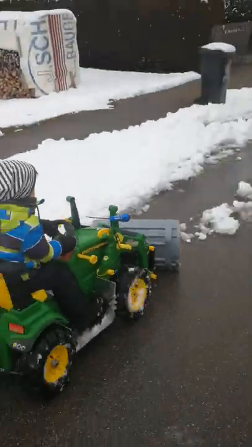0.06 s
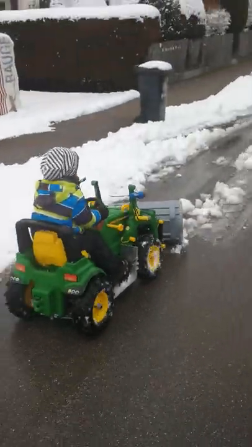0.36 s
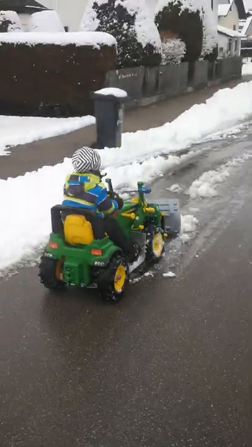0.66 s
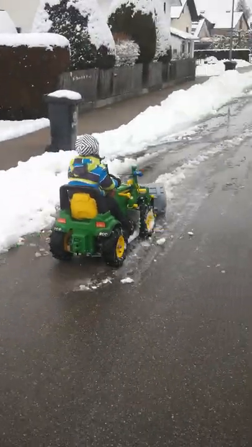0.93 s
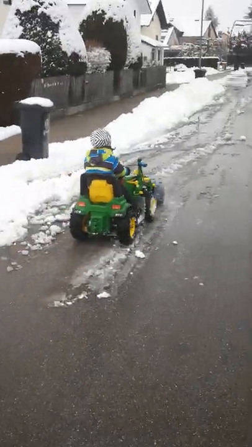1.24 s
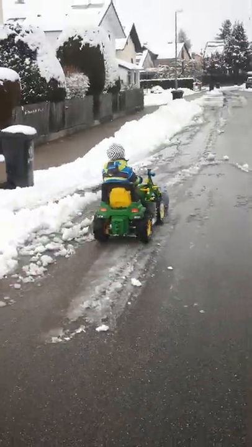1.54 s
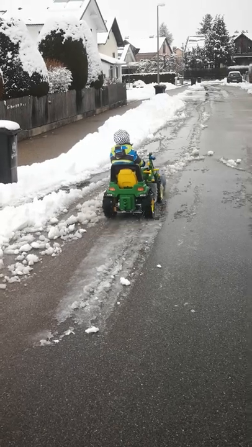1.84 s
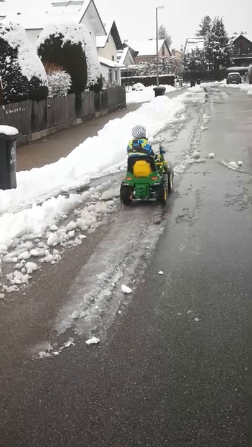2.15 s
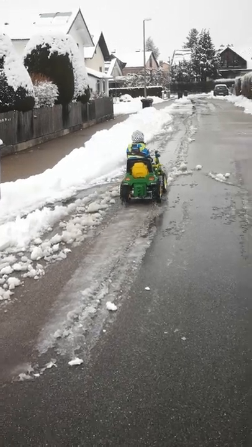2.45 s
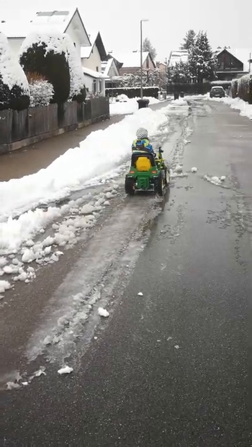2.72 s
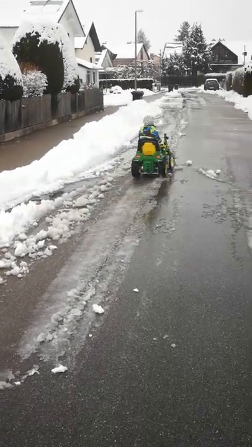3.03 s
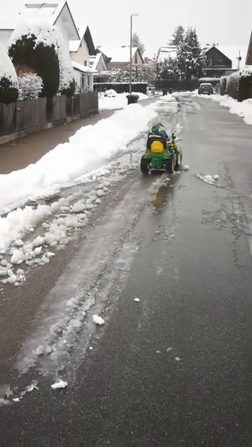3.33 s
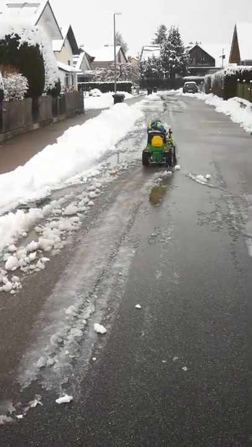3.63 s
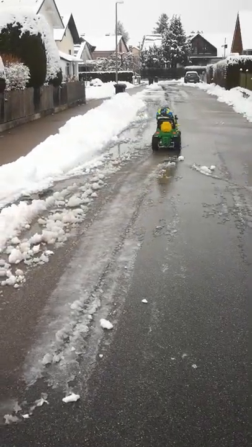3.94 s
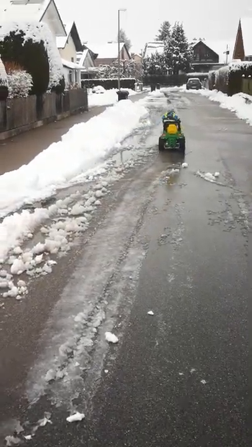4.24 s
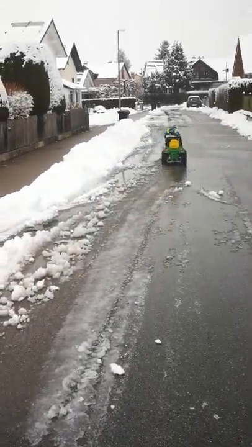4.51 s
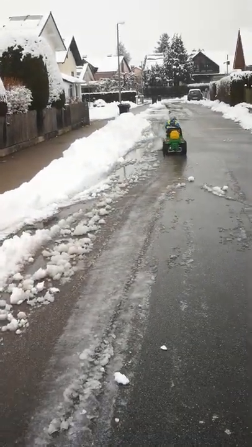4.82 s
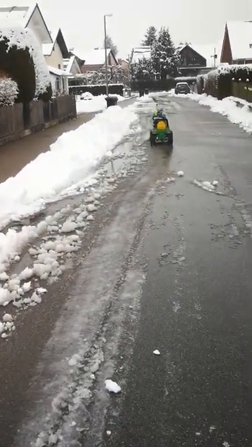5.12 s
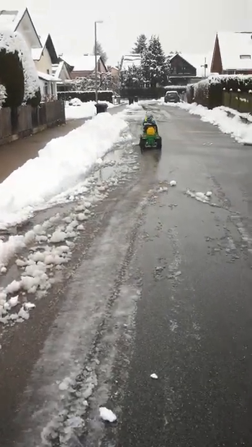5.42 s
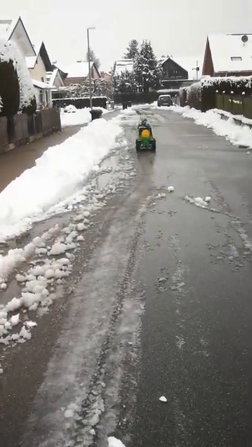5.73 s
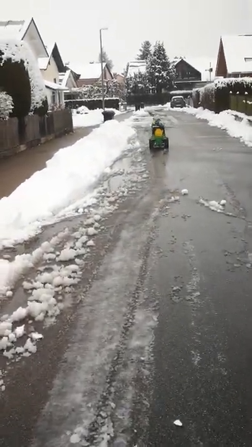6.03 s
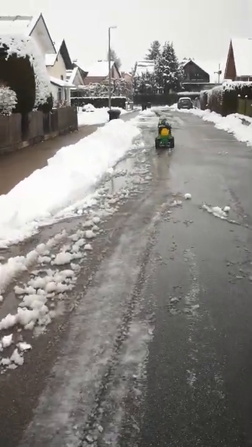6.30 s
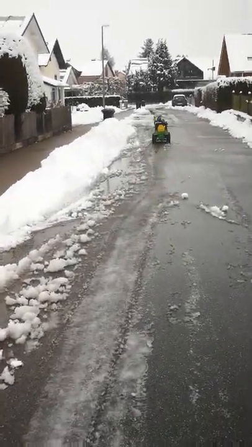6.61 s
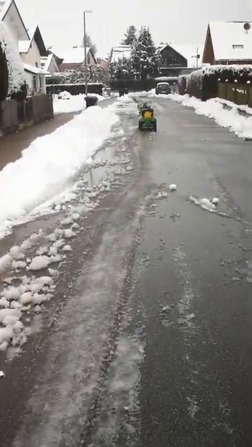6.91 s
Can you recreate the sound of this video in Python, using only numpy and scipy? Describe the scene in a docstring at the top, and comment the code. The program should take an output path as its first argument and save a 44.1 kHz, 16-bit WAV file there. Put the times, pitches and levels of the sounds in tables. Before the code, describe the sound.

A small electric toy tractor pushes a plastic snow blade over wet, slushy asphalt, starting right beside the microphone. For the first 0.7 seconds the blade scrapes loudly, grinding grit, with hollow knocks, plastic clacks and a fine fizz of spray. From about 1 to 2.4 seconds it is quieter: hard wheels rumble in the hollow body and hiss on the wet road. The blade catches briefly around 2.5 seconds. From 2.8 seconds to the end at about 7 seconds it sticks and slips in uneven, juddering scrapes with frequent dull thuds, strongest between 3 and 4.5 seconds but softer than the opening. Slush crunches and small ice grains snap throughout this stretch, with light spray around 4.5 seconds. The wheel rumble fades steadily as the toy drives away. Faint, low street noise lies underneath.

```python
"""A child's electric toy tractor pushes a plastic snow blade along a wet, slushy street.
It starts close to the microphone and drives away. The blade sticks, slips and knocks over the
asphalt, grinding grit and crushing slush; hard wheels rumble in the hollow shell and throw up spray.
The microphone's two ports hear it with a reflection off a nearby surface, the street faint behind."""
import sys
import numpy as np
from scipy import signal
from scipy.io import wavfile
from scipy.ndimage import uniform_filter1d

SR = 44100
rng = np.random.default_rng(int(sys.argv[2]) if len(sys.argv) > 2 else 0)


def generate_wav(signal):
    """Clip the signal to [-1, 1] and save it as 16-bit WAV at the path in sys.argv[1]."""
    frames = np.transpose(np.atleast_2d(signal))
    scaled = np.clip(frames, -1, 1) * 32767
    pcm = np.round(scaled).astype(np.int16)
    wavfile.write(sys.argv[1], SR, pcm)


N = 315756
TIME = np.arange(N) / SR


def amp(db):
    """Decibels to gain."""
    return 10 ** (np.asarray(db) / 20)


def unit(x):
    """Scales to rms 1."""
    return x / np.sqrt(np.mean(x ** 2) + 1e-20)


def unit_peak(x):
    """Scales to peak 1."""
    return x / abs(x).max()


def spectrum_at(points, hz):
    """Reads a spectrum on a log-frequency axis."""
    freq_hz, value = np.transpose(points)
    return np.interp(np.log(hz + 1), np.log(freq_hz + 1), value)


def follow(rows, t=TIME):
    """The columns of a curve table at the times t."""
    time_s, *columns = np.transpose(rows)
    return [np.interp(t, time_s, column) for column in columns]


def add(mix, start_s, sound):
    """Mixes a sound in at start_s."""
    part = mix[max(round(start_s * SR), 0):][:len(sound)]
    part += sound[:len(part)]


def colour(x, spectrum, size=2048):
    """Causal filter with the given spectrum, so clicks keep their attack."""
    log_gain = np.log(amp(spectrum_at(spectrum, abs(np.fft.fftfreq(size, 1 / SR)))))
    taps = np.fft.ifft(np.exp(np.conj(signal.hilbert(log_gain)))).real
    return signal.fftconvolve(x, taps)[:len(x)]


def mode(x, hz, width_hz):
    """One damped mode at a set pitch."""
    return signal.lfilter(*signal.iirpeak(hz, hz / width_hz, SR), x)


def resonate(x, hz, width_hz):
    """A resonance whose pitch can follow a curve, at rms 1."""
    turn = np.exp(2j * np.pi * np.cumsum(hz * np.ones(len(x))) / SR)
    pole = np.exp(-np.pi * width_hz / SR)
    return unit((turn * signal.lfilter([1], [1, -2 * pole, pole * pole], x / turn)).real)


def steady(x, window_s):
    """Holds the slow level at 1 and keeps the fast grain."""
    power = uniform_filter1d(x ** 2, int(window_s * SR))
    power = uniform_filter1d(power, int(window_s * SR / 2))
    return x / np.sqrt(abs(power) + 1e-12)


def drift(count, step_s):
    """A slow random curve of spread about 1."""
    return np.interp(np.arange(count) / SR / step_s, np.arange(512), rng.standard_normal(512))


def clicks(per_s, spread_db):
    """Random clicks of either sign and uneven size."""
    size = amp(spread_db * np.minimum(rng.exponential(1, N), 4))
    return size * rng.choice([-1, 1], N) * (rng.random(N) < per_s / SR)


def surges(per_s, decay_s, base, rise_s=0.0023):
    """Pressure that builds quickly at uneven moments and dies away after each."""
    kicks = rng.uniform(0.66, 1, N) * (rng.random(N) < per_s / SR)
    pressure = signal.lfilter([1], [1, -np.exp(-1 / (decay_s * SR))], kicks)
    return base + uniform_filter1d(pressure, 1 + int(2 * rise_s * SR))


# The street in the distance: freq_hz, gain_db
STREET_SPECTRUM = [(15, -35), (50, 3), (110, -7), (220, 29.5), (500, 14), (1000, -56), (3000, -38),
                   (8000, -31), (16000, -54)]

def street(level_db, stereo_width):
    """Faint far-off background, nearly the same at both ports."""
    common, side = (unit(colour(rng.standard_normal(N), STREET_SPECTRUM)) for _ in range(2))
    return amp(level_db) * (common + stereo_width * np.array([side, -side]))


def scattered(x, tail_db, tail_s, size=256):
    """Paths over road and fences change as the toy moves: a short tail and a different blur per port."""
    t = np.arange(SR // 2) / SR
    tail = rng.standard_normal(len(t)) * np.exp(-t / tail_s)
    x = x + amp(tail_db) * signal.fftconvolve(x, tail / np.linalg.norm(tail))[:N]
    frames = signal.stft(x, SR, nperseg=size)[2]
    blurred = frames * np.exp(2j * np.pi * rng.random((2, *frames.shape)))
    return np.std(x) * unit(signal.istft(blurred, SR, nperseg=size)[1][:, :N])


# Echo off a surface beside the microphone, shifting with the angle: time_s, left_ms, right_ms
REFLECTION_DELAY = [(0, 1.52, 1.03), (1.1, 1.62, 1.17), (2.5, 1.76, 1.19), (3.0, 1.8, 1.25),
                    (4.1, 1.85, 1.27), (4.4, 1.9, 1.39), (5.15, 2.0, 1.44), (5.45, 1.91, 1.37),
                    (7.16, 1.9, 1.38)]
# Strength of that echo: freq_hz, left_gain, right_gain
REFLECTION_GAIN = [(196, 0.67, 0.61), (1170, 0.12, 0.55), (2900, 0.049, 0.16), (6500, 0.036, 0.52),
                   (14100, .02, 0.74)]
# The left port's lead and treble balance; the right port sounds muffled until about 4.2 s,
# then opens up: time_s, left_lead_samples, left_treble_db
PORT_BALANCE = [(0, 1.34, 14), (1.5, 3.25, 14), (4.1, 5.6, 17), (4.4, 4.14, -4.5), (7.16, 4.7, 5)]
# Scattered sound against direct sound: freq_hz, gain_db
SCATTER_SPECTRUM = [(30, -51), (200, -35), (800, -13.5), (1500, -2), (4000, -6), (7000, -2.5), (14000, 2.5)]

def microphone(x, shade_hz, scatter_db, size=1024):
    """Each port hears the direct sound, a close reflection that combs it, and the scatter."""
    framing = dict(fs=SR, nperseg=size, noverlap=size * 3 // 4)
    hz, t, direct = signal.stft(x, **framing)
    diffuse = signal.stft(scattered(x, tail_db=-4.5, tail_s=0.015), **framing)[2]
    hz = hz[:, None]
    side = np.array([0.5, -0.5])[:, None, None]
    lead_samples, treble_db = follow(PORT_BALANCE, t)
    delay_ms = np.array(follow(REFLECTION_DELAY, t))[:, None]
    share = np.array([spectrum_at(np.array(REFLECTION_GAIN)[:, [0, port]], hz) for port in (1, 2)])
    bounce = share * np.exp(-2j * np.pi * hz * delay_ms / 1000)
    comb = 1 + bounce + 0.012 * bounce ** 2  # a weaker second bounce sharpens the peaks
    arrival = np.exp(2j * np.pi * side * hz * lead_samples / SR)
    shade = amp(side * treble_db * hz / (hz + shade_hz))
    wet = amp(spectrum_at(SCATTER_SPECTRUM, hz) + scatter_db)
    centre = np.sqrt(abs((shade * arrival).mean(0)) ** 2 + wet ** 2 / 2)
    both = shade * comb * (direct * arrival + wet * diffuse) / centre  # the ports' sum keeps its colour
    return signal.istft(both, **framing)[1][:, :N]


# Puddles along the street: start_s, end_s, level_db
PUDDLES = [(0, 0.804, -52.5), (4.246, 4.726, -49.5), (4.656, 5.19, -55.5), (5.55, 5.776, -52.5),
           (5.995, 6.25, -62)]
# Fine droplets: freq_hz, gain_db
MIST_SPECTRUM = [(6000, -42), (9500, 13), (11500, 6), (16000, -3)]

def spray(gain_db, between_puddles_db):
    """Tiny droplets fizz off the wheels and the blade, swelling in each puddle."""
    level = np.full(N, amp(between_puddles_db))
    for start_s, end_s, level_db in PUDDLES:
        swell = np.sin(np.linspace(0, np.pi, int((end_s - start_s) * SR)))
        add(level, start_s, amp(level_db) * swell)
    drops = surges(per_s=80, decay_s=0.005, base=0.7) * clicks(per_s=12000, spread_db=2)
    return amp(gain_db) * level * steady(colour(drops, MIST_SPECTRUM), window_s=0.29)


# The toy's hollow plastic shell: pitch_hz, width_hz, gain_db
SHELL_MODES = [(178.4, 92, -10.5), (224.1, 17, 2.5), (266.2, 30.6, 2.5), (342.5, 57, 3.5),
               (461, 35.3, -0.5), (498.5, 84, -2), (622, 130, -2.5), (673.7, 80, -1.5), (830, 128, -9),
               (952, 136, -4.5), (1035, 44, -5.5)]

def shell(force, wander_db=3.0, wander_s=0.04):
    """The body rings in damped modes; their shares change as the point of contact wanders."""
    out = np.zeros(len(force))
    for k, (pitch_hz, width_hz, gain_db) in enumerate(SHELL_MODES):
        share = amp(wander_db * drift(len(force), wander_s))
        out += (-1) ** k * amp(gain_db) * mode(force * share, pitch_hz, width_hz)
    return out


# The wheels fade with distance from the microphone: time_s, gain_db
WHEEL_FADE = [(0, 2.5), (.85, -3), (1.85, -4.5), (2.3, -5), (2.7, -8.5), (4.3, -12.5), (6.0, -14.5),
              (7.16, -15)]
# Rumble in the shell and hiss of wet treads: freq_hz, gain_db
RUMBLE_SPECTRUM = [(30, -32), (70, -4.5), (125, 2.5), (165, -8), (220, -5), (330, -10.5), (450, -13),
                   (650, -11), (1000, -16.5), (2000, -23), (6000, -28)]
TREAD_SPECTRUM = [(400, -2.5), (1000, 6), (2000, 4.5), (2700, 4), (3800, 3.5), (5000, -4.5), (8000, -7.5),
                  (11000, -13.5), (16000, -10.5)]

def wheels(rumble_db, hiss_db):
    """Hard treads patter on the asphalt, drum in the shell and peel off the water film."""
    patter = surges(per_s=39, decay_s=0.0098, base=0.64) * clicks(per_s=3000, spread_db=-1.0)
    rumble = steady(colour(shell(patter), RUMBLE_SPECTRUM), window_s=0.074)
    hiss = steady(colour(clicks(per_s=16000, spread_db=2.2), TREAD_SPECTRUM), window_s=0.15)
    return amp(follow(WHEEL_FADE)[0]) * (amp(rumble_db) * rumble + amp(hiss_db) * hiss)


# Ice grains and drops snap on the road: start_s, level_db, pitch_hz
ICE_SNAPS = [(0.09, -20, 9000), (3.854, -29, 6950), (3.9696, -39, 8500), (4.245, -33, 9000),
             (6.892, -37, 9500), (3.423, -25, 12400), (3.6387, -28.5, 6400), (3.988, -23.5, 7300),
             (4.0315, -22.5, 6300), (4.5397, -28, 9000), (4.6301, -32, 7040), (4.642, -30, 9100),
             (5.249, -37, 7000), (5.093, -30.5, 6200), (5.475, -37, 6000), (5.526, -36, 6800),
             (6.1963, -33, 6500), (6.4515, -35, 6850), (6.674, -35, 7000)]
# Loose plastic parts clack on the toy: start_s, level_db, pitch_hz
PLASTIC_CLACKS = [(0.058, -19, 1040), (0.1, -14.5, 1040), (0.318, -19, 1440), (0.592, -20, 850),
                  (2.2468, -29.5, 2370), (2.978, -25.5, 3420), (4.4284, -30, 1330), (4.784, -30, 1430),
                  (4.8798, -27, 1400), (5.6216, -23, 3500), (5.6826, -30.5, 2390)]

def ticks(table, gain_db, decay_s, q):
    """Snaps or clacks: short bursts, each ringing round its own pitch."""
    out, t = np.zeros(N), np.arange(1024) / SR
    for start_s, level_db, pitch_hz in table:
        burst = rng.standard_normal(len(t)) * np.exp(-t / decay_s)
        ring = signal.iirpeak(pitch_hz, q, SR)
        tick = signal.lfilter(*ring, signal.lfilter(*ring, burst))
        add(out, start_s, amp(level_db + gain_db) * unit_peak(tick))
    return out


# Slush crushed under the blade: freq_hz, gain_db
SLUSH_SPECTRUM = [(2500, -60), (4300, -24), (5000, -2), (6900, 5.5), (7900, 0), (8800, -5), (10300, -27),
                  (16000, -48)]

def ice_crackle(slush_level, gain_db, per_s):
    """Small ice grains burst at random wherever the blade crushes slush."""
    return amp(gain_db) * slush_level * unit(colour(clicks(per_s, spread_db=4.0), SLUSH_SPECTRUM))


def passing_lumps(x, patch_db, size=256):
    """Stones and lumps of all sizes pass: the colour shifts from moment to moment."""
    frames = signal.stft(x, SR, nperseg=size)[2]
    patch_shape = np.outer(np.hanning(9), np.hanning(11))
    patches = unit(signal.convolve2d(rng.standard_normal(frames.shape), patch_shape, "same"))
    return signal.istft(frames * amp(patch_db * patches), SR, nperseg=size)[1][:N]


def without_deep_bass(x, low_cut_hz=118):
    """Cuts away the deep bass below low_cut_hz."""
    return signal.sosfilt(signal.butter(4, low_cut_hz, "high", fs=SR, output="sos"), x)


# The stiff plastic blade: pitch_hz, width_hz, gain_db
BLADE_MODES = [(1211, 26, -1), (1454, 185, 0.5), (2022, 93, 5), (2166, 64, 3.5), (2744, 170, -0.5),
               (3144, 76, 2), (3410, 82, -4.5), (3770, 100, 2), (4490, 78, 0), (6400, 330, -12)]

def blade_ring(x, ring_db, wander_db=3, wander_s=0.22):
    """The blade adds its ring; each mode swells and fades as the contact moves along the edge."""
    ring = np.zeros(len(x))
    for pitch_hz, width_hz, gain_db in BLADE_MODES:
        swell_db = wander_db * drift(len(x), wander_s)
        ring += amp(gain_db + ring_db + swell_db) * mode(x, pitch_hz, width_hz)
    return x + ring


# The blade bites into the street and scrapes along: start_s, end_s, force_db
BITES = [(0.0, 0.154, -25), (0.17, 0.193, -30), (0.188, 0.284, -25), (0.341, 0.389, -28),
         (0.404, 0.507, -27.5), (0.541, 0.605, -30), (0.681, 0.744, -36), (0.899, 0.931, -38),
         (2.394, 2.602, -43.5), (2.455, 2.53, -37), (2.738, 2.803, -49), (2.8, 2.865, -37),
         (2.864, 2.998, -32.5), (3.074, 3.112, -39.5), (3.238, 3.328, -34), (3.404, 3.484, -37.5),
         (3.502, 3.538, -36.5), (3.556, 3.657, -32), (3.673, 3.687, -32), (3.716, 3.82, -31),
         (3.81, 3.975, -34.5), (3.972, 4.063, -31), (4.072, 4.296, -35), (4.332, 4.509, -35.5),
         (4.587, 4.692, -39), (4.823, 4.944, -42.5), (4.981, 5.156, -37), (5.182, 5.2, -36.5),
         (5.244, 5.3, -40.5), (5.287, 5.42, -36), (5.433, 5.59, -36.5), (5.61, 5.741, -37.5),
         (5.846, 5.979, -37.5), (6, 6.039, -42), (6.104, 6.197, -44.5), (6.192, 6.248, -36.5),
         (6.277, 6.425, -41.5), (6.422, 6.509, -36.5), (6.578, 6.745, -37), (6.771, 6.792, -40.5),
         (6.814, 7.113, -38.5)]
USUAL_FORCE_DB = -36

def blade_force(rise_s, release_s, sag_db, drag_db, drag_s):
    """The blade bites at once, eases, lets go, and drags on ever more lightly until the next bite."""
    force = np.zeros(N)
    for start_s, end_s, force_db in BITES:
        first, length_s = round(start_s * SR), end_s - start_s
        t = TIME[:N - first][:2 * SR]
        after_s = np.maximum(t - length_s, 0)
        hold = np.minimum(t / rise_s, 1) * amp(force_db + sag_db * np.maximum(1 - t / length_s, 0))
        release = np.maximum(np.exp(-after_s / release_s), amp(drag_db) * np.exp(-after_s / drag_s))
        part = force[first:][:len(t)]
        part[:] = np.maximum(part, hold * release)
    return force


# Notes of the rubbing edge, at the usual force: start_s, end_s, pitch_hz, width_hz, level_db
SINGING_NOTES = [(0.05, 0.116, 1046, 130, -37.5), (2.455, 2.498, 970, 170, -37.5),
                 (2.8, 4.076, 949, 69, -51.5), (3.554, 4.06, 2160, 130, -58), (6.192, 7.0, 3400, 250, -55),
                 (6.19, 7.12, 1187, 80, -55)]

def blade_singing(force, fade_s, growth=0.81):
    """Single modes of the blade ring on while the edge rubs, louder under more force."""
    out = np.zeros(N)
    for start_s, end_s, pitch_hz, width_hz, level_db in SINGING_NOTES:
        t = np.arange(0, end_s - start_s, 1 / SR)
        fade = np.clip(np.minimum(t, t[-1] - t) / fade_s, 0, 1)
        rubbing = rng.standard_normal(2 * SR)[:len(t)]
        add(out, start_s, amp(level_db) * fade * resonate(rubbing, pitch_hz, width_hz))
    return out * (force / amp(USUAL_FORCE_DB)) ** growth


# The road under the blade, at the usual force: time_s, grit_db, slush_db
ROAD_SURFACE = [(0, -35.5, -49), (.3, -45, -63), (.48, -43.5, -56), (.62, -38.5, -50.5), (1.0, -42, -51.5),
                (2.4, -43, -53), (2.95, -45.5, -53.5), (3.35, -53, -62.5), (3.8, -48.5, -45.5),
                (4.28, -48.5, -44.5), (4.32, -47.5, -53), (4.65, -45.5, -45.5), (5.3, -44.5, -51),
                (5.95, -48, -50), (6.07, -45, -48.5), (6.2, -47.5, -52), (6.47, -47, -45.5),
                (6.62, -45, -55.5), (6.79, -50.5, -53.5), (6.9, -47, -51), (7.16, -41.5, -49.5)]

def scrape_levels(force, grit_growth=0.78, slush_growth=0.55):
    """Judder follows the force; grit and slush grow more slowly and depend on the road."""
    grit_db, slush_db = follow(ROAD_SURFACE)
    load = force / amp(USUAL_FORCE_DB)
    return np.array([force, amp(grit_db) * load ** grit_growth, amp(slush_db) * load ** slush_growth])


# Shell judder and grit, close to the microphone and farther down the street: freq_hz, gain_db
JUDDER_CLOSE = [(40, -12), (110, -5), (200, 0), (370, 6), (700, 6), (1080, -5), (1500, -14), (2500, -5),
                (6000, -21)]
GRIT_CLOSE = [(300, -9), (800, -1), (920, 6), (1050, 9), (1200, 2), (1450, 3), (2100, -2), (2600, -4.5),
              (3800, -1.5), (4750, -2), (5300, -5), (9000, -15), (16000, -44)]
JUDDER_FAR = [(40, -31), (110, -33), (190, 0), (700, 1), (950, -2), (1120, -21.5), (2500, -8), (6000, -24)]
GRIT_FAR = [(300, -43), (800, 10), (1150, 10), (1500, 4), (1850, 6), (2200, -1.5), (2600, -1), (3300, 3),
            (4100, 1.5), (4700, 0.5), (5500, -2), (8000, -7), (10000, -10), (16000, -31)]
# The blade's hollow resonance shifts as it tilts and bends: time_s, pitch_hz
HOLLOW_PITCH = [(2.4, 564), (3.8, 600), (3.88, 508), (4.01, 660), (4.12, 500), (4.24, 636), (5.03, 450),
                (5.08, 600), (5.12, 517), (5.71, 480), (5.81, 600), (5.85, 480), (7.11, 616), (7.15, 496)]
# The shell booms under a heavy load, relative to its judder: time_s, level_db
SHELL_BOOM = [(0, -10.5), (2.9, -19), (3.5, -23), (3.8, -7.5), (4.6, -7.5), (5.1, -24), (6.1, -28),
              (6.9, -4)]

def blade_scrape(levels, judder_spectrum, grit_spectrum, judder_db, hollow_db, grit_db, slush_db):
    """The edge sticks and slips; each slip shakes the shell, grinds grit and crushes slush."""
    slips = surges(per_s=90, decay_s=0.007, base=0.3)
    shake = (slips + 0.67) * clicks(per_s=2200, spread_db=1.0)
    hollow = resonate(slips * clicks(per_s=1000, spread_db=1.0), follow(HOLLOW_PITCH)[0], width_hz=182)
    boom = resonate(slips * clicks(per_s=2700, spread_db=-5.0), hz=200, width_hz=60)
    body = unit(colour(shell(shake), judder_spectrum))
    judder = steady(body + amp(hollow_db) * hollow + amp(follow(SHELL_BOOM)[0]) * boom, window_s=0.026)
    grit = colour((slips + 1.35) * clicks(per_s=4500, spread_db=2.5), grit_spectrum)
    grit = steady(blade_ring(passing_lumps(grit, patch_db=0.15), ring_db=2), window_s=0.05)
    slush = colour((slips + 0.22) * clicks(per_s=1200, spread_db=1.5), SLUSH_SPECTRUM)
    slush = steady(blade_ring(passing_lumps(slush, patch_db=1.0), ring_db=-4), window_s=0.067)
    return without_deep_bass(amp([judder_db, grit_db, slush_db]) @ (levels * [judder, grit, slush]))


# The blade hits a bump in the street and drops: start_s, thud_db, crack_db, pitch_hz
BUMPS = [(0.087, -7.5, -12, 676), (0.136, -7.5, -13, 404), (0.193, -13, -16.5, 935), (0.314, -15, -21, 400),
         (0.342, -18, -32, 340), (0.421, -10, -27, 350), (0.47, -9.5, -42, 370), (0.554, -18.5, -20, 330),
         (0.591, -11, -29, 716), (2.417, -20, -24, 394), (2.469, -17, -40, 790), (2.874, -14.5, -36, 550),
         (2.928, -16, -38, 623), (2.962, -14, -28, 674), (3.084, -19, -26, 310), (3.241, -20, -40, 560),
         (3.279, -16, -35, 330), (3.313, -17.5, -33, 556), (3.422, -20, -30.5, 395),
         (3.471, -14.5, -28.5, 636), (3.641, -16, -27, 650), (3.716, -16.5, -44, 350),
         (3.77, -11.5, -23, 610), (4.034, -14.5, -32, 550), (4.21, -19, -38, 620), (4.248, -13, -31, 596),
         (4.375, -17, -36, 645), (4.452, -14.5, -41, 580), (4.533, -18.5, -28.5, 450),
         (4.638, -19.5, -24, 527), (4.727, -20.5, -34, 390), (4.831, -22.5, -33, 358),
         (5.09, -16.5, -26, 590), (5.152, -16, -33, 560), (5.302, -16.5, -23, 532),
         (6.207, -18.5, -31.5, 560), (6.346, -13.5, -21.5, 600), (6.434, -18, -34, 490),
         (6.45, -19, -30.5, 650), (6.484, -24, -42, 650), (6.702, -16.5, -26, 570), (6.89, -16, -25, 400),
         (6.943, -15.5, -29, 680), (7.047, -18.5, -29, 335), (7.125, -19.5, -31, 480)]
# The crack of its edge: freq_hz, gain_db
CRACK_SPECTRUM = [(400, -10), (1200, 7.5), (2100, -1.5), (3300, 4), (4800, -0.5), (7000, -1.5), (9000, -3),
                  (11000, -19), (16000, -13)]

def blade_knocks(thud_gain_db, crack_gain_db, rattle_s, crack_s, note_db, note_s, push_db, push_s):
    """Each bump or bite gives a sharp push, a short hollow note, a dying rattle and a crack."""
    thuds, cracks, t = np.zeros(N), np.zeros(N), np.arange(4096) / SR
    knock_delay_s = 0.002  # thud and crack sound this long after the listed time
    # the edge catches just after each bite; same columns as BUMPS
    catches = [(start_s + 0.006, force_db + 10.5, force_db - 6.5, 560) for start_s, _, force_db in BITES]
    push = (1 - t / push_s) * np.exp(-t / push_s)
    for start_s, thud_db, crack_db, pitch_hz in BUMPS + catches:
        rattle, grain = rng.standard_normal((2, len(t)))
        impulse = t == 0
        body = shell(0.069 * rattle * np.exp(-t / rattle_s) + impulse)
        note = np.sin(2 * np.pi * pitch_hz * t) * np.exp(-t / note_s)
        thud = colour(unit_peak(body) + amp(note_db) * note + amp(push_db) * push, JUDDER_FAR)
        snap = grain * abs(grain) * np.exp(-t / crack_s) + 6 * impulse
        crack = blade_ring(colour(snap, CRACK_SPECTRUM), ring_db=8.0)
        add(thuds, start_s + knock_delay_s, amp(thud_db + thud_gain_db) * unit_peak(thud))
        add(cracks, start_s + knock_delay_s, amp(crack_db + crack_gain_db) * unit(crack))
    return without_deep_bass(thuds) + passing_lumps(cracks, patch_db=4.5)


def scene():
    """The tractor ploughs off down the street, away from the microphone."""
    tractor = wheels(rumble_db=-37.5, hiss_db=-44.5) + spray(gain_db=-10.0, between_puddles_db=-60.5)
    force = blade_force(rise_s=0.00031, release_s=0.0039, sag_db=1.0, drag_db=-8.0, drag_s=0.18)
    levels = scrape_levels(force)
    close = TIME < 1.8  # the first heap of snow is pushed aside close by
    tractor += blade_scrape(levels * close, JUDDER_CLOSE, GRIT_CLOSE,
                            judder_db=-1, hollow_db=-17, grit_db=1.24, slush_db=-3.7)
    tractor += blade_scrape(levels * ~close, JUDDER_FAR, GRIT_FAR,
                            judder_db=0, hollow_db=-7, grit_db=-2.5, slush_db=-4.5)
    tractor += blade_singing(force, fade_s=0.0097)
    hits = ice_crackle(slush_level=levels[2], gain_db=-10.5, per_s=57)
    hits += blade_knocks(thud_gain_db=-7.5, crack_gain_db=-25.0, rattle_s=0.0097, crack_s=0.0045,
                         note_db=-5.5, note_s=0.0048, push_db=-6.5, push_s=0.00042)
    hits += ticks(ICE_SNAPS, gain_db=0.5, decay_s=0.0012, q=1.65)
    hits += ticks(PLASTIC_CLACKS, gain_db=-7.0, decay_s=0.011, q=2.4)
    heard = microphone(tractor, shade_hz=8550, scatter_db=-0.5)
    heard += microphone(hits, shade_hz=8550, scatter_db=-2.0)
    return heard + street(level_db=-53.5, stereo_width=0.12)


def record(dry):
    """The recorder's band limit cuts the highest treble."""
    low_pass = signal.firwin(511, cutoff=15950, window=("kaiser", 9), fs=SR)
    return signal.oaconvolve(dry, low_pass[None], "same")


dry = scene()
out = record(dry)
generate_wav(out)
```